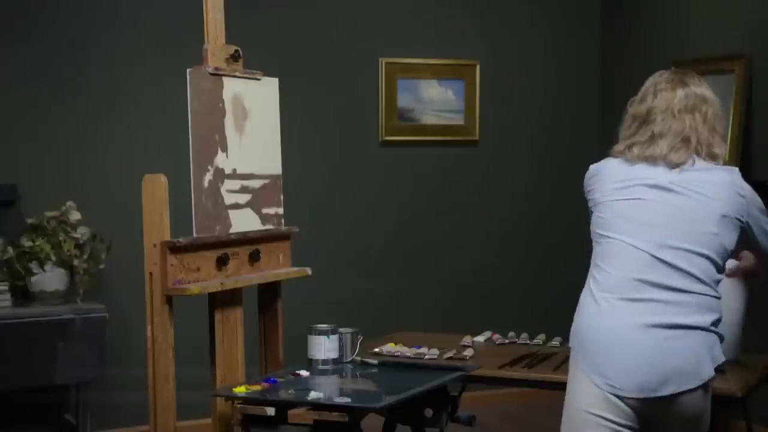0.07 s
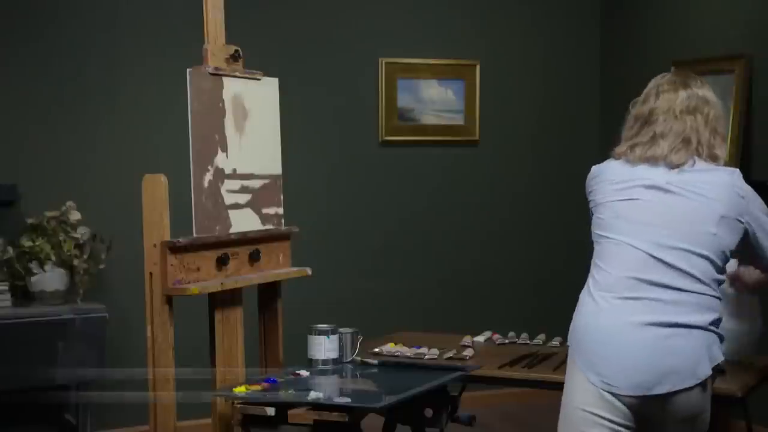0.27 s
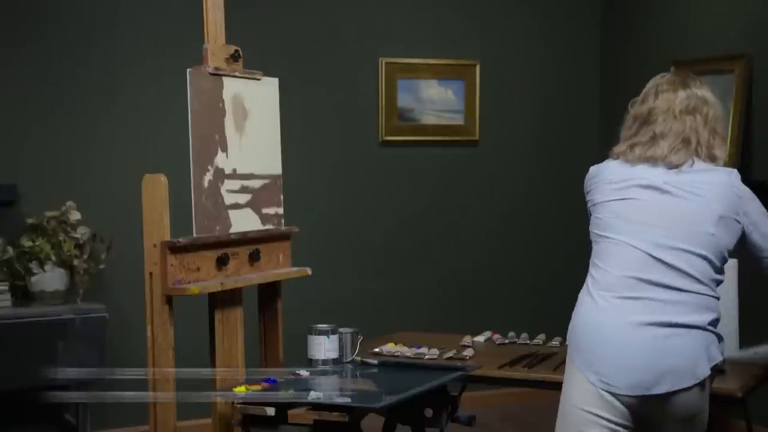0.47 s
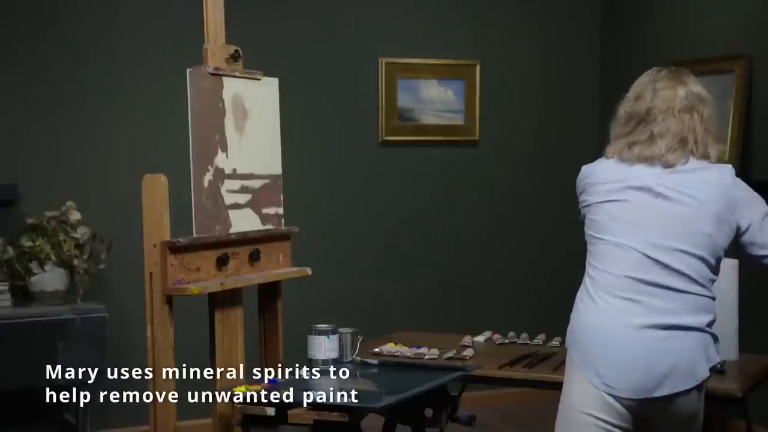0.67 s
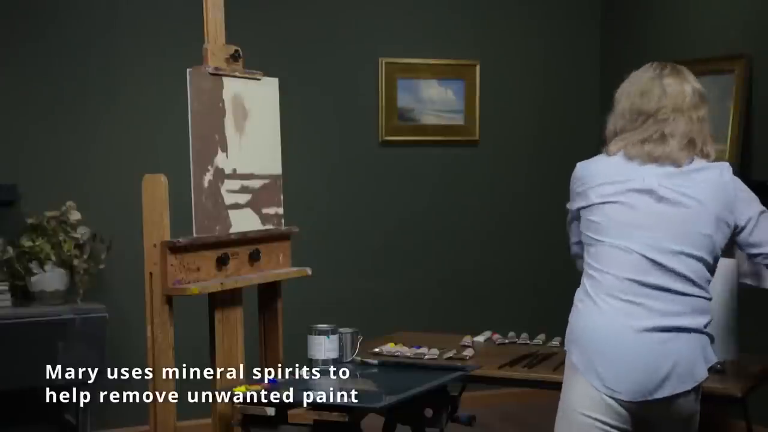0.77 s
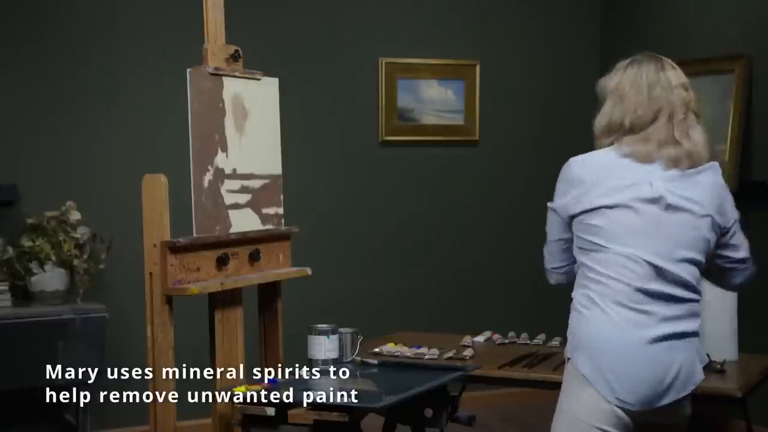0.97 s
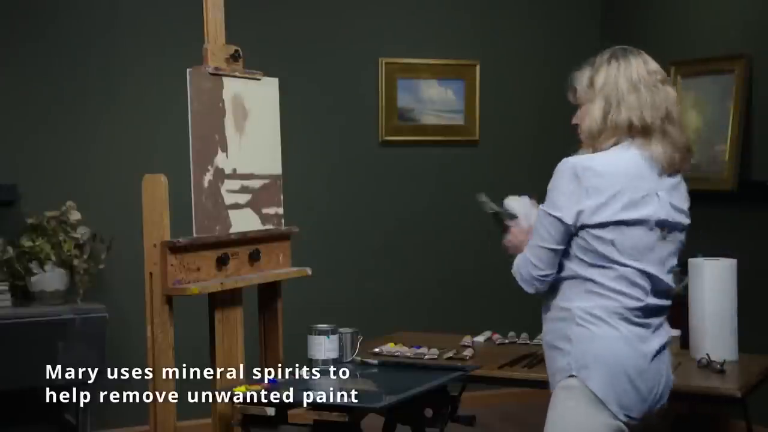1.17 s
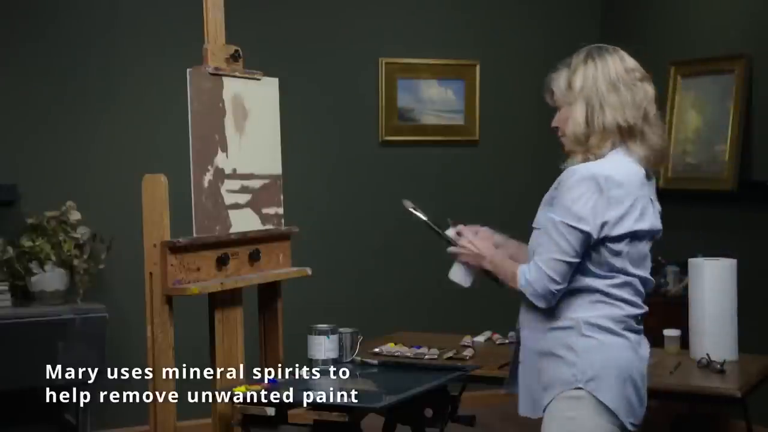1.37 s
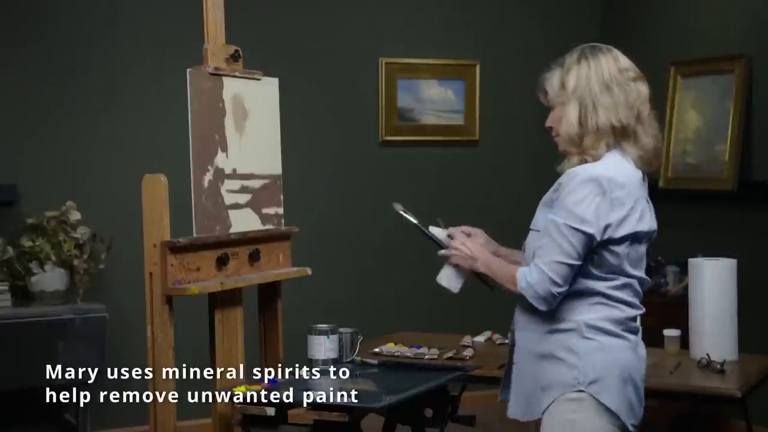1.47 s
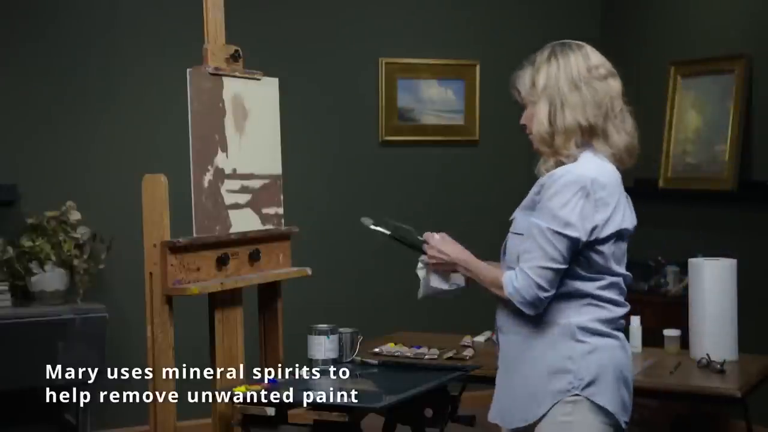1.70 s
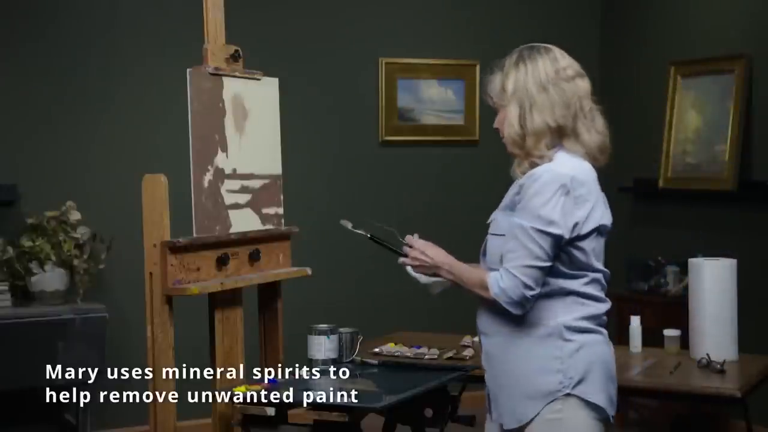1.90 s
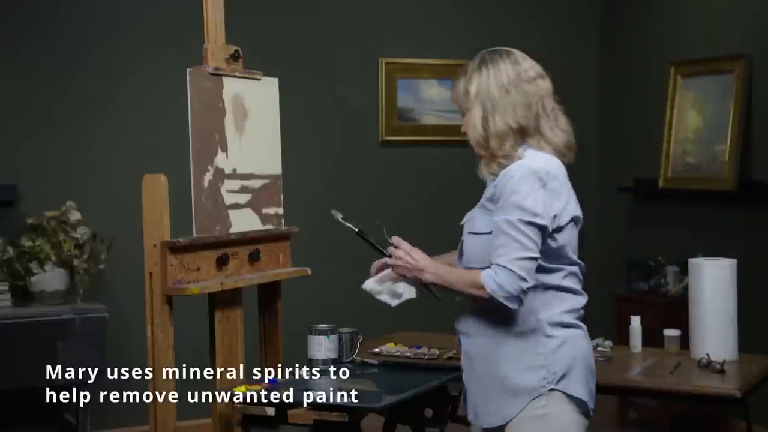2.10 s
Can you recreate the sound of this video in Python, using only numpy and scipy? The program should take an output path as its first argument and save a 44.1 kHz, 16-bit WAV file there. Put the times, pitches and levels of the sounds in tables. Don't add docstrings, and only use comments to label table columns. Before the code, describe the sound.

Soft swish of a paper roll, a short crackling rip along the perforation, then light wiping and crumpling with a tight squeeze near the end, heard in a quiet studio with gentle microphone bumps.

```python
import sys
import numpy as np
from scipy import signal
from scipy.fft import rfft, irfft, next_fast_len
from scipy.io import wavfile
from scipy.ndimage import uniform_filter1d

SR = 44100
rng = np.random.default_rng(int(sys.argv[2]) if len(sys.argv) > 2 else 0)


def boost_factor(decibels):
    exponent = np.asarray(decibels, float) / 20
    return 10 ** exponent


def materialize(psi):
    bounded = np.clip(np.atleast_2d(psi).T, -1, 1)
    quanta = np.round(bounded * 32767).astype(np.int16)
    wavfile.write(sys.argv[1], SR, quanta)


N = 94594

# frequency [Hz], level [dB].
FIBRE_HISS = [(3000, -36.5), (5200, -11.5), (7000, -14), (9000, -17), (11000, -18), (15500, -19)]
# frequency [Hz], level [dB].
SPLIT_HISS = [(2500, -3), (5000, -2.5), (7000, 3.5), (10000, -6), (15500, -10)]


def evened(x):
    return x / np.sqrt(np.mean(x ** 2) + 1e-20)


def read(points, hz):
    f, value = np.transpose(points)
    return np.interp(np.log(hz + 1), np.log(f + 1), value)


def add(mix, s, sound):
    part = mix[round(s * SR):][:len(sound)]
    part += sound[:len(part)]


def coloured(x, points):
    hz = np.abs(np.fft.fftfreq(4096, 1 / SR))
    log_gain = np.log(boost_factor(read(points, hz)))
    taps = np.fft.ifft(np.exp(np.conj(signal.hilbert(log_gain)))).real[:2048]
    return signal.oaconvolve(x, taps / np.linalg.norm(taps))[:len(x)]


def resonate(x, hz, width):
    turn = np.exp(2j * np.pi * np.cumsum(hz * np.ones(len(x))) / SR)
    r = np.exp(-np.pi * width / SR)
    return 2 * (turn * signal.lfilter([1 - r], [1, -r], x / turn + 1e-18)).real


def grains(length, per_s, spread_db):
    hit, size, sign = rng.random((length, 3)).T
    large = -np.log(size + .03)
    return evened((hit < per_s / SR) * boost_factor(spread_db * large) * np.sign(sign - .5))


def patchy(x, patch_db, flicker_db):
    z = signal.stft(x, nperseg=256, noverlap=192)[2]
    a = rng.standard_normal(z.shape[::-1]).T
    over_pitch = uniform_filter1d(a, size=5, axis=0)
    patches = evened(uniform_filter1d(over_pitch, size=24, axis=1))
    flicker = evened(uniform_filter1d(a[0], size=14))
    z = z * boost_factor(patch_db * patches + flicker_db * flicker)
    return evened(signal.istft(z, nperseg=256, noverlap=192)[1][:len(x)])


def room_tone():
    # frequency [Hz], level [dB].
    air = [(25, 8.5), (60, 6.5), (120, 12), (200, -6.5), (450, -8.5), (1200, -25), (4500, -21.5),
           (15500, -49)]
    return boost_factor(-64) * coloured(patchy(rng.standard_normal(N), 0.74, 0.12), air)


def hands():
    # time [s], effort [dB], dull bulk [dB], fine fibre hiss [dB].
    handling = [(0, -75, 8.5, 9.5), (.16, -67.5, 4, 3.5), (0.272, -67.5, 4, -1), (0.344, -57.5, 7.5, 5),
                (.53, -66, 13, 1), (.61, -69.5, 3.5, 2), (.74, -75.5, 9.5, 6.5), (.92, -73.5, -3, 6),
                (.99, -66.5, -5, 2), (1.012, -57, -1, 3.5), (1.11, -57.5, -1, 1), (1.277, -56.5, 4.5, -0.5),
                (1.318, -59, -12, -0.5), (1.408, -57.5, 6.5, 4), (1.45, -66, 6, 6.5), (1.618, -72, 3, 3.5),
                (1.69, -59, 2.5, 1.5), (1.892, -54.5, -31, 0.5), (1.943, -68.5, 6, 3.5),
                (2.14, -69, 9, -1.5)]
    # frequency [Hz], level [dB].
    sheet_colour = [(300, 0), (900, -1.5), (1500, -1), (2700, 1), (3800, -3.5), (5200, -20), (8000, -33)]
    # frequency [Hz], level [dB].
    bulk_colour = [(40, -26.5), (150, 2.5), (430, -1), (900, -7.5), (1500, -4), (2500, -20), (5000, -57)]
    t = np.arange(N) / SR
    s, *cols = np.transpose(handling)
    effort, dull, fine = (np.interp(t, s, c) for c in cols)
    drive = grains(N, 9000, 1.7)
    sheet = coloured(patchy(drive, 1.96, 0.33), sheet_colour)
    bulk = coloured(patchy(grains(N, 3000, 0.97), 2.9, 3.2), bulk_colour)
    rubbing = drive + 0.45 * rng.standard_normal(N)
    fibre = coloured(patchy(rubbing, 2.34, 0.19), FIBRE_HISS)
    return boost_factor(effort) * (sheet + boost_factor(dull - 3.5) * bulk + boost_factor(fine - 7.5) * fibre)


def roll():
    # start [s], length [s], level [dB], resonance [Hz], width [Hz].
    swish = (.005, .155, -61, 1330, 340)
    s, length, db, hz, width = swish
    u = np.arange(0, length, 1 / SR) / length
    drive = grains(len(u), 7000, 1.1)
    hollow = evened(resonate(resonate(drive, hz, width), hz, 2 * width))
    return s, boost_factor(db) * np.sin(np.pi * u ** 0.65) ** 1.5 * hollow


def stroke(s, length, db, hz, hiss_db):
    t = np.arange(0, length, 1 / SR)
    width = hz / 0.97
    drive = grains(len(t), 7000, 3.9)
    body = evened(resonate(resonate(drive, hz, width), hz, width))
    swell = np.sin(np.pi * (t / length) ** 1.24) ** 0.57
    return s, boost_factor(db) * swell * (body + boost_factor(hiss_db) * coloured(drive, FIBRE_HISS))


def crack():
    # start [s], level [dB], t60 [s].
    burst = (.3472, -43, .013)
    s, db, t60 = burst
    t = np.arange(0, t60, 1 / SR)
    envelope = boost_factor(db - 60 * t / t60) * np.minimum(t / 0.0016, 1) ** 2
    return s, 4 * envelope * coloured(rng.standard_normal(len(t)), SPLIT_HISS)


def snap(s, db, hz, t60):
    t = np.arange(0, 1.5 * t60, 1 / SR)
    onset = (1 - np.exp(-t * hz * 2.8)) ** 2
    return s, -2 * boost_factor(db - 60 * t / t60) * onset * np.sin(2 * np.pi * hz * t)


def bump(s, db, hz):
    cycles = 1.2
    u = np.arange(0, cycles / hz, 1 / SR) * hz
    return s, -boost_factor(db) * np.sin(np.pi * u / cycles) * np.sin(2 * np.pi * u)


def tear(curve):
    # time [s], crackle [dB], sheet tone [dB].
    bridges = [(.354, -3, 8), (0.3588, 6, 3), (0.3617, 3, 5.5), (0.3658, 2, -2), (.3695, 6, 4),
               (.373, 6, -2), (0.3792, 7, -3), (0.385, 3.5, -5), (.3912, 3, 10), (0.3988, 2, -7),
               (0.403, 2, -7), (.4083, -9, -6), (0.415, 7, -6), (0.4214, 6.5, -15), (0.429, 4, -4),
               (.4318, -0.5, -12), (.44, 2.5, 6.5), (0.4472, 1, 0), (.452, -10, -5), (.457, 2, 2.5),
               (.46, 3, -3), (.465, -9, 2), (0.4681, 2.5, 0), (.474, -4.5, 8), (0.4784, 3, -9),
               (0.4834, 5, 5), (0.4874, 0, 8), (0.4925, -8, -6), (0.4949, 5, -9), (0.4993, -2, 0),
               (0.5042, 6, -7), (.5105, 4, 12), (1.8161, -7, -14), (1.822, -3, -11), (1.828, 4, 7),
               (1.835, 2, -2), (1.8421, -1, -4), (1.8518, 4, 3), (1.858, 5, 7), (1.8671, -1, -7),
               (1.8755, -2, -1), (1.883, 2, -2), (1.889, 0, -3)]
    # frequency [Hz], level [dB].
    crackle_colour = [(150, 1.5), (270, -3.5), (700, 1.5), (1100, 5), (1700, -2.5), (2500, -7), (3800, -13),
                      (5200, -24.5)]
    fall_s, between = .0045, .55
    s, *cols = np.transpose(curve)
    t = np.arange(s[0], s[-1], 1 / SR)
    pull, hz, crackle, hiss = (np.interp(t, s, c) for c in cols)
    at, crackle_db, tone_db = np.transpose(bridges)[..., None]
    fall = np.where(t > at, np.exp(-abs(t - at) / fall_s), 0)

    def bunches(db):
        return evened(between + uniform_filter1d((boost_factor(db) * fall).sum(0), size=20))

    bunch, surge = bunches(crackle_db), bunches(tone_db)
    first = 3.0 * (abs(t - at - .0005) < 2 / SR).sum(0)
    pops = grains(len(t), 1000, 2.5) + 0.6 * rng.standard_normal(len(t))
    width = hz.mean() / 2
    tone = evened(resonate(resonate((pops + first) * surge, hz, width), hz, 2 * width))
    fine = bunch * evened(0.55 * pops + 0.26 * first + 0.81 * grains(len(t), 4000, 0.91))
    crackling = boost_factor(crackle) * coloured(fine, crackle_colour)
    splitting = boost_factor(hiss) * coloured(bunch * grains(len(t), 4200, 1.1), SPLIT_HISS)
    return s[0], boost_factor(pull) * (tone + crackling + splitting)


def body_echo(paper):
    # time [s], centre of the dip [Hz].
    shadow = [(0, 4900), (.6, 4630), (0.952, 5450), (1.05, 5650), (1.42, 7330), (1.55, 7500), (2.14, 8400)]
    wobble_hz = 130 * evened(uniform_filter1d(rng.standard_normal(N), size=2500))
    dip_hz = np.interp(np.arange(N) / SR, *np.transpose(shadow)) + wobble_hz
    shaded = paper - 0.7 * resonate(paper, dip_hz, 2000)
    return shaded + 0.34 * resonate(shaded, 1.49 * dip_hz, 1820)


def room(x):
    # frequency [Hz], t60 [s].
    decay = [(200, 0.28), (500, 0.53), (1400, 0.55), (3700, 0.22), (9700, 0.22)]
    taps = np.zeros(SR // 2)
    at = np.arange(300, len(taps) - 20, 20)
    taps[at + rng.integers(0, 20, len(at))] = rng.choice([-1., 1.], len(at))
    hz, t, z = signal.stft(taps, SR, nperseg=256)
    dying = boost_factor(-60 * t / read(decay, hz)[:, None])
    tail = signal.istft(z * dying, SR, nperseg=256)[1]
    return signal.fftconvolve(x, tail / np.linalg.norm(tail))[:N]


def scene():
    # start [s], length [s], level [dB], centre [Hz], fibre hiss [dB].
    strokes = [(0.173, 0.063, -63.5, 830, -6.5), (0.768, 0.13, -65, 1880, -2),
               (0.825, 0.064, -63, 527, -16), (0.217, 0.046, -67.5, 2524, 2.5),
               (1.005, 0.034, -63.5, 2670, -10), (1.045, 0.063, -59.5, 3100, -12),
               (1.115, 0.055, -55.5, 2760, -11), (1.183, 0.041, -53, 2650, -12.5),
               (1.19, .03, -56, 3050, -25), (1.232, 0.041, -54.5, 3300, -11),
               (1.258, 0.018, -57, 1500, -16), (1.371, 0.063, -57.5, 1500, -17),
               (1.51, 0.045, -62.5, 1290, -27), (1.302, 0.09, -66.5, 554, -24),
               (1.697, 0.055, -57.5, 2195, -4.5), (1.759, 0.087, -56, 1670, -11.5),
               (1.826, 0.035, -56, 3580, -21), (1.942, 0.035, -63.5, 2350, -6.5),
               (2.054, 0.089, -68.5, 2020, -1.5)]
    # start [s], peak [dB], pitch [Hz], t60 [s].
    first_slips = [
        (.3476, -23.5, 900, .0045),
        (.3487, -22.5, 880, .004),
        (.3498, -14.5, 760, .0033),
    ]
    # start [s], peak [dB], pitch [Hz], t60 [s].
    snaps = [(0.3494, -38, 460, 0.0095), (0.36, -31.5, 1660, 0.0075), (.3483, -38, 3100, 0.004),
             (.3525, -40, 450, .012), (0.36, -39.5, 1356, .03), (0.39, -45.5, 377, 0.16),
             (0.48, -32, 1040, 0.0066), (0.437, -39.5, 248.6, 0.056), (0.4966, -32, 1780, .011),
             (0.83, -62.5, 4400, 0.018), (1.463, -42.5, 276, 0.022), (1.4645, -48, 670, 0.011),
             (1.4635, -54, 1530, 0.015), (1.4907, -49, 2600, 0.019), (1.4908, -50.5, 3250, 0.0077),
             (1.4908, -63, 3900, .005), (1.589, -54, 2650, 0.0071), (1.59, -62, 1410, 0.0077),
             (1.609, -61, 520, .015), (1.7132, -43, 1800, 0.0067), (1.8281, -33, 1220, 0.004),
             (1.829, -45, 216, 0.041), (1.868, -40.5, 2800, 0.0033), (1.8422, -41, 1180, 0.012),
             (.4568, -54, 3700, .008), (.4915, -51, 3750, .012), (0.35, -40, 2660, 0.012),
             (.512, -48, 980, .015), (1.8669, -15, 627, 0.0026)]
    # time [s], pull [dB], sheet tone [Hz], crackle [dB], hiss [dB].
    rip = [
        (.3515, -50, 398, 22, -16),
        (.356, -53.5, 393, 9.5, -16),
        (.375, -49, 366, 2.5, -14),
        (.41, -56.5, 400, 12, -3.5),
        (.455, -38.5, 393, -3.5, -49),
        (.485, -37.5, 462, -3.5, -55),
        (.499, -46.5, 493, 5.5, -47),
        (.503, -53.5, 600, 7, -28),
        (.53, -64, 700, -12, -33),
    ]
    # time [s], pull [dB], sheet tone [Hz], crackle [dB], hiss [dB].
    squeeze = [
        (1.815, -63, 450, 3, -15),
        (1.83, -61, 423, 2.2, -18),
        (1.85, -59, 503, 2.3, -21),
        (1.875, -53.5, 450, 1.2, -11),
        (1.9, -91, 450, 2, -8),
    ]
    # start [s], peak [dB], pitch [Hz].
    bumps = [(0.35, -51, 39.4), (0.384, -45, 109), (0.486, -42.5, 113), (1.004, -41, 96.5),
             (1.168, -45.5, 86), (1.337, -48.5, 128), (1.391, -45, 105), (1.408, -49.5, 62.4),
             (1.484, -55, 55.56), (1.558, -53, 80), (1.853, -47.5, 120)]
    paper, close = hands(), np.zeros(N)
    events = [roll(), crack(), tear(rip), tear(squeeze)]
    events += [stroke(*row) for row in strokes]
    events += [snap(*row) for row in first_slips + snaps]
    for event in events:
        add(paper, *event)
    for row in bumps:
        add(close, *bump(*row))
    shaded = body_echo(paper)
    one = shaded + boost_factor(-18.5) * room(shaded) + close + room_tone()
    return np.array([one, one])


def band_limit(x):
    return signal.sosfilt(signal.butter(12, 15680, fs=SR, output="sos"), x)


def record(dry):
    low_cut_hz, low_cut_q, right_db = 245, .71, 2.6
    merge_hz, align_hz, edge_hz = 14000, 950, 15560
    size = next_fast_len(N + 8192)
    hz = np.fft.rfftfreq(size, 1 / SR)
    u = 1j * hz / low_cut_hz
    cut = u ** 2 / (1 + u / low_cut_q + u ** 2)
    lead = np.angle(cut) / (1 + (hz / align_hz) ** 6)
    lift = boost_factor(right_db / (1 + (hz / merge_hz) ** 4))
    right = irfft(rfft(dry[1], size) * abs(cut) * lift * np.exp(1j * lead), size)[:N]
    own_noise = boost_factor(-87.0) * rng.standard_normal((2, N))
    both = np.array([dry[0], right]) + own_noise
    both = irfft(rfft(both, size) * (hz < edge_hz), size)[:, :N]
    return band_limit(both)


dry = scene()
out = record(dry)
materialize(out)
```